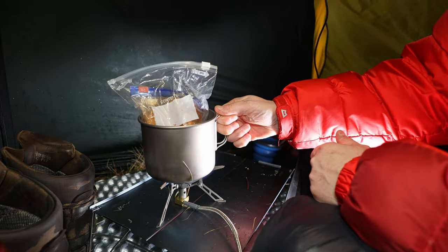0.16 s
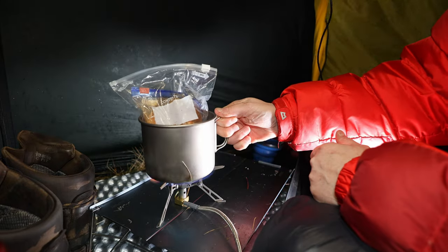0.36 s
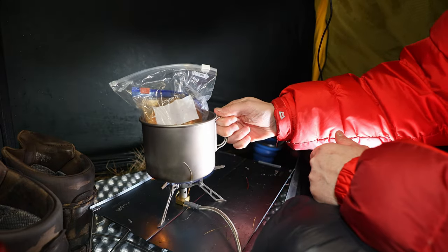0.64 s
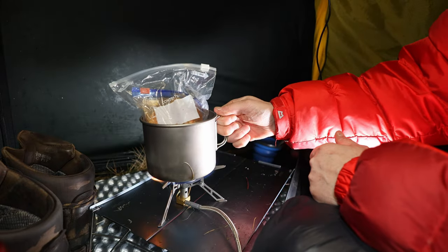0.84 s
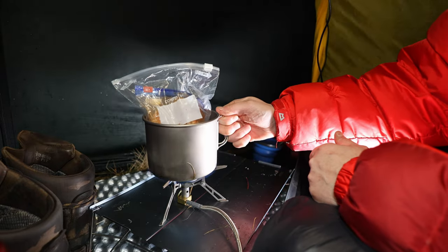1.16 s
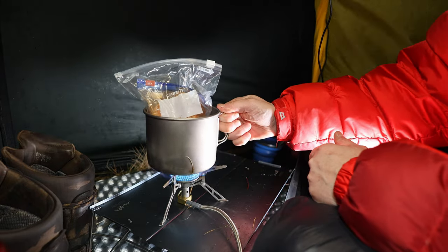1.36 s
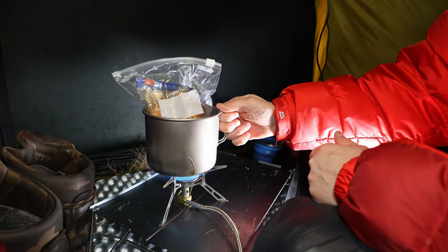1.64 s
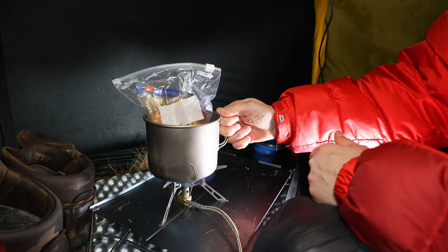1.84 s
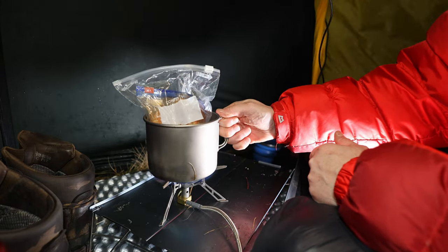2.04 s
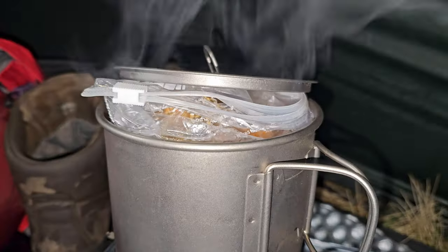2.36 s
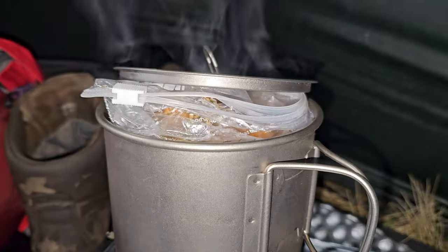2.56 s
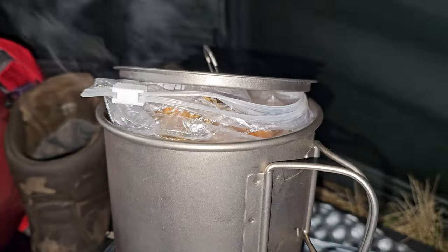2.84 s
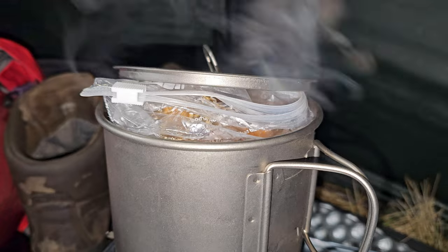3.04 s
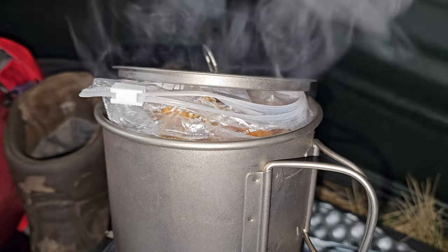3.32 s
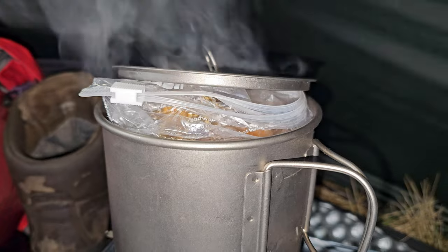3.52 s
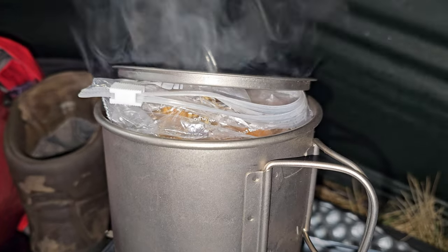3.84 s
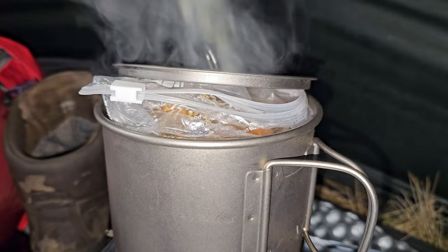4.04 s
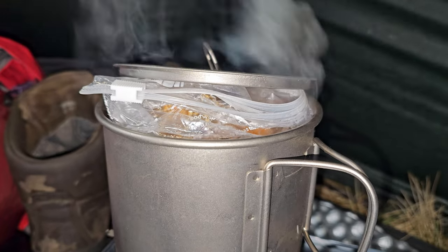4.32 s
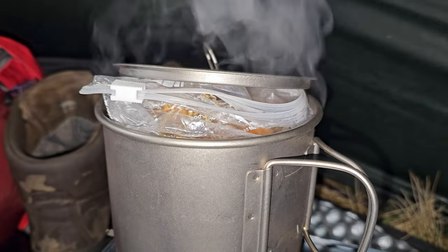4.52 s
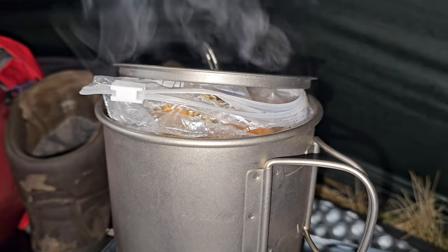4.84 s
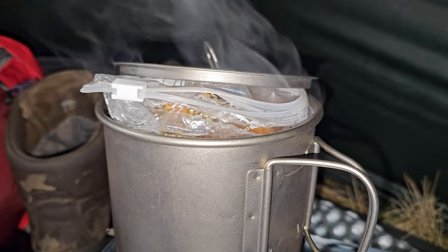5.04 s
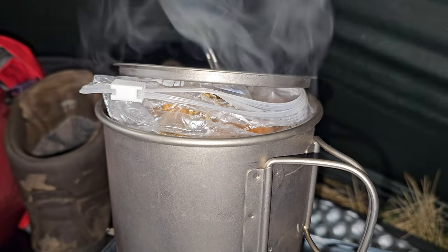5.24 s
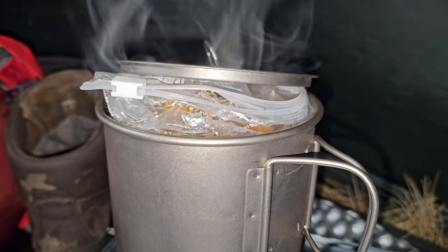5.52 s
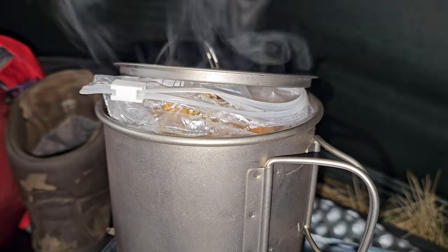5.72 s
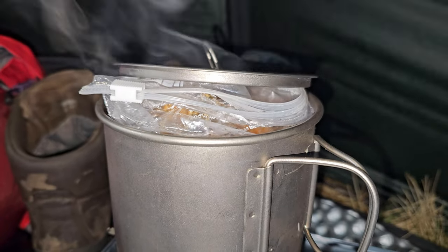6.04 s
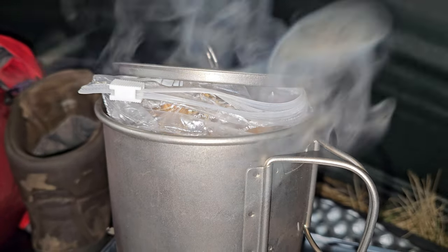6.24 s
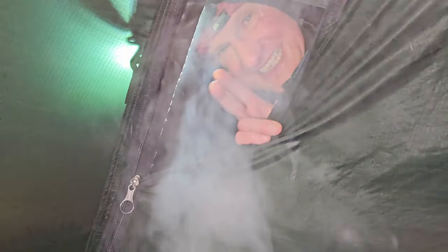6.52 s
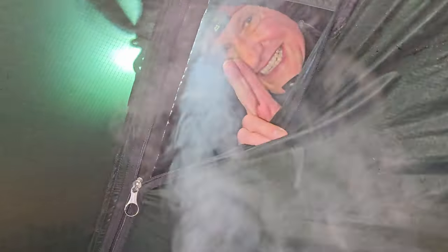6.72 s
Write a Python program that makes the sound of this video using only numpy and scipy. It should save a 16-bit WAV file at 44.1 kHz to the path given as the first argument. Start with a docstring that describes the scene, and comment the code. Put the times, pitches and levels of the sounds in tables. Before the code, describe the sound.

A small gas stove hisses nearby inside a tent, with a high, breathy whistle and a low, fluttering flame. At about 0.5 seconds a metal pot clicks sharply twice on its supports, and at 1.8 seconds it knocks dully. Nylon rustles lightly as a low wind rumble builds. Between 2.1 and 2.7 seconds the mono sound dissolves into a stereo close-up of the steaming pot, a softer ringing hiss with a fine sizzle. Gusts make the tent walls boom, flap and snap, slightly to the left, strongest from 2.7 to 3.5 seconds. Drops spit faintly on hot metal around 3 seconds and again near 6. The wind eases between 4 and 5 seconds, then returns with a heavy thump at 5.6. After a tiny break at 6.4 seconds, the burner hisses from further off under lighter gusts until about 7 seconds.

```python
"""A gas stove hisses and whistles in a tent, its flame fluttering in the draught. The metal pot, held by
its handle, clicks twice on the supports, then knocks dully. This mono opening dissolves into a stereo
close-up of the steaming pot: drops spit on hot metal while gusts make the tent cloth boom and flap.
After a short break the burner is heard from further off."""
import sys
import numpy as np
from scipy import signal
from scipy.fft import rfft, irfft, next_fast_len
from scipy.io import wavfile
from scipy.ndimage import uniform_filter1d, map_coordinates

SR = 44100
rng = np.random.default_rng(int(sys.argv[2]) if len(sys.argv) > 2 else 0)


def file_out(sig):
    """Save sig as 16-bit WAV at sys.argv[1]."""
    # one column per channel
    cols = np.atleast_2d(sig).T
    # limit, then scale
    lim = np.clip(cols, -1, 1)
    pcm = np.round(lim * 32767).astype(np.int16)
    wavfile.write(sys.argv[1], SR, pcm)


N = 303393

# wind leaning on the tent between gusts: (time [s], boom level [dB])
STEADY_WIND = [(2.1, -25), (2.55, -23), (2.9, -19.5), (3.28, -24), (3.6, -23.5), (4.15, -29), (4.5, -32),
               (4.87, -31.5), (5.35, -24.5), (5.9, -20), (6.25, -25), (6.43, -32), (6.88, -31.5)]
# gusts hit a tent panel: (start [s], length [s], boom [dB], flutter [dB], panel pitch [Hz])
GUSTS = [(2.673, 0.06, -14.5, -25, 260), (2.772, 0.075, -19.5, -35.5, 120), (2.847, .17, -17.5, -30, 250),
         (3.1, 0.054, -18.5, -31.5, 150), (3.37, 0.075, -19.5, -38, 150), (3.439, 0.13, -21.5, -34.5, 250),
         (3.569, 0.079, -23, -42, 290), (3.935, .035, -19.5, -31.5, 230), (4.257, 0.11, -25, -46, 95),
         (4.56, 0.027, -26.5, -42, 260), (4.629, 0.078, -26, -45, 100), (4.97, 0.045, -25.5, -31.5, 250),
         (5.058, 0.11, -24.5, -36, 290), (5.439, .09, -21.5, -35.5, 200), (5.584, 0.14, -15.8, -24.3, 240),
         (5.775, .15, -15.5, -24, 240), (6.56, 0.12, -22.5, -40.5, 252), (6.771, .03, -25.5, -38, 100)]
# a whole wall bellies out: (time [s], level [dB], pitch [Hz])
WALL_THUMPS = [(1.965, -16, 200), (2.66, -10.5, 60), (3.479, -7.5, 93), (5.607, -5, 82)]
# a fold of cloth snaps taut: (time [s], level [dB], pitch [Hz])
FOLD_SNAPS = [(0.267, -31, 1650), (0.517, -32, 1100), (1.332, -32, 1800), (1.966, -25, 1090),
              (1.977, -23, 1390), (2.02, -23, 1950), (2.465, -25, 1870), (2.590, -22, 1090),
              (2.693, -13.5, 950), (2.865, -20.5, 1090), (2.998, -14, 1180), (3.196, -21.5, 875),
              (3.301, -19.5, 1370), (3.437, -23, 850), (3.481, -20, 1200), (3.950, -17, 980),
              (5.217, -24, 1510), (5.610, -14, 1180), (6.02, -19, 1970)]
# nylon brushes on nylon: (time [s], level [dB])
RUSTLES = [(0.1664, -31.5), (0.4246, -30.5), (1.5287, -34.5), (1.906, -26.3), (3.459, -36), (3.694, -38),
           (4.17, -36.5), (4.524, -36), (4.985, -37), (5.6908, -32), (5.912, -31.5), (6.21, -36.5),
           (6.2682, -37), (6.4023, -43)]
# drops spit on hot metal: (time [s], level [dB], pitch [Hz], splutter against ring [dB])
SPITS = [(2.788, -33.5, 11450, -10), (3.055, -42, 10800, -2), (3.182, -32.5, 14130, -1),
         (5.673, -42, 11500, -12), (5.807, -35, 14200, -1), (6.150, -41, 11750, -8)]
# the pot clicks on its supports: (time [s], peak level [dB])
POT_CLICKS = [(0.4475, -4), (0.5706, -2)]
# the flame roars as it takes hold: (time [s], level [dB])
FLAME_ROAR = [(0, -36), (.7, -34), (1.25, -31), (1.9, -32.5), (2.25, -34.5)]
# puffs of draught ruffle the flame: (start [s], length [s], level [dB])
DRAUGHT_PUFFS = [(0.395, .05, -35), (.54, .02, -39), (0.818, .04, -37), (1.06, .04, -36.5),
                 (1.266, .05, -34), (1.55, .08, -35), (1.745, .04, -40.5), (1.952, .045, -27.5)]
# the gas jet: (time [s], hiss level [dB], whistle pitch [Hz])
GAS_JET = [(0, -39.5, 4294), (.78, -39, 4340), (1.05, -38.6, 4480), (1.4, -38.5, 4414), (1.58, -41, 4380),
           (1.95, -37, 4465), (2.25, -41, 4425), (2.5, -42, 4420)]

# resonances: (frequency [Hz], width [Hz], relative level [dB])
WALL_MODES = [(92, 26.4, 0)]  # the tent wall as a slack drum
POT_RING_MODES = [(3250, 560, -6), (5010, 420, 0), (7210, 264, 3.5), (8375, 900, -35.5), (11700, 500, -13)]  # hiss ringing around the pot
POT_KNOCK_MODES = [(1080, 170, 3), (1455, 160, 1), (3230, 120, -19)]  # the full pot, knocked
BURNER_HEAD_MODES = [(2240, 110, -5.5), (3300, 300, -7.5), (3960, 180, 0), (5200, 250, -5.5),
                     (6090, 210, 2.5), (6440, 110, -5), (6900, 190, 1), (7550, 230, 3), (8250, 160, 1),
                     (10870, 380, -11.5)]  # the head, rung by the jet

# tone colours: (frequency [Hz], relative level [dB])
BOOM_SPECTRUM = [(11, -37), (18, -3), (48, 3.5), (80, 1.5), (231, -9.5), (392, -24), (447, -21.5),
                 (489, -22), (600, -20.5), (780, -27), (1320, -120)]  # deep wind
FOLD_SPECTRUM = [(150, -2.5), (280, 1.5), (380, -5), (450, 0), (600, -9.5), (820, -5), (1000, -10.5),
                 (1200, -11), (1650, -14.5), (2400, -27.5), (3000, -24.5), (5000, -46), (9000, -65)]  # shaken cloth
NYLON_SPECTRUM = [(500, -11), (1600, 6.5), (3500, 5.5), (8000, -7), (16000, -13)]  # brushing nylon
STEAM_SPECTRUM = [(600, 3), (1500, 5.5), (3200, -1.5), (6000, -2.5), (8500, -1.5), (10500, -9.5),
                  (13000, -8), (16000, -4.5)]  # hiss at the steaming pot
METAL_SPECTRUM = [(300, 0), (2200, -16), (3500, -4.5), (8500, -2), (11000, -5.5), (13000, -7),
                  (16000, -2.5)]  # metal on metal
DRAUGHT_SPECTRUM = [(100, -7), (300, -2), (600, -5.5), (1000, -11), (2000, -19.5), (5000, -41)]  # fluttering flame
FLAME_SPECTRUM = [(40, -35), (90, -10), (160, -3), (235, -1), (320, -6.5), (480, -12.5), (650, -18.5),
                  (1000, -23.5), (2000, -59)]  # low roar
FAR_JET_SPECTRUM = [(1000, -5), (2000, 0.5), (4000, -2), (5200, 0), (6300, -7), (7500, 3), (8600, -1),
                    (10000, -8), (16000, -8)]  # the jet from further off
JET_SPECTRUM = [(600, -48), (1400, -2), (2300, -7.5), (2700, -5), (3200, -1), (3650, -12), (4300, 2),
                (5300, 1), (6100, -4), (8200, -4.5), (9200, -6.5), (10200, -24), (12000, -26), (16000, -17)]  # the jet nearby

# how alike left and right sound: (frequency [Hz], likeness [1 and above = fully alike])
STEREO_LIKENESS = [(110, 1.5), (220, 1.15), (400, 0.74), (800, .88), (1400, 0.4), (2200, .5), (7000, 0.02),
                   (15000, -0.07)]
# how the image leans: (frequency [Hz], left minus right [dB])
STEREO_TILT = [(60, 0.42), (110, 0.76), (200, 1.9), (380, 2.3), (700, 2.1), (1290, 4.4), (2380, 2.4),
               (4400, 0.26), (8120, 6), (15000, 1.5)]
# dissolve from the opening to the close-up: (time [s], progress [0 to 1])
DISSOLVE = [(2.08, 0), (2.65, 1)]

GUST_RISE_S, GUST_FALL_S = 0.02, 0.051
CALM_BOOM_DB, CALM_FLUTTER_DB, FLUTTER_DB_PER_DB = -29.5, -43.5, 0.81  # cloth flutter follows the wind
BREEZE_FINAL_DB, BREEZE_CLIMB_DB, BREEZE_BUILD_S = -37.5, 14, 0.82
STEAM_DB, POT_RING_DB = -45.5, -44
KNOCK_S, KNOCK_PEAK_DB = 1.830, -15
HEAD_DB, WHISTLE_DB, WHISTLE_WAVER_HZ = 1.5, 1.66, 25.04  # levels against the hiss of the jet
NORMAL_JET_DB, HEAD_DB_PER_DB = -39.5, 0.5  # the head rings harder as the jet rises over normal
BREAK_START_S, BREAK_END_S, BREAK_DB = 6.36, 6.392, -34.5
TOP_HZ = 15900


def amp(db):
    """Decibels to gain."""
    return 10 ** (np.asarray(db) / 20)


def unit(x):
    """Scale to rms 1."""
    return x / np.sqrt(np.mean(x ** 2) + 1e-20)


def peaked(x):
    """Scale to peak 1."""
    return x / np.abs(x).max()


def along(points, hz):
    """Read (frequency [Hz], value) points on a log axis."""
    freqs, values = np.transpose(points)
    return np.interp(np.log(hz + 1), np.log(freqs + 1), values)


def clock(size=N):
    """The time of each sample in seconds."""
    return np.arange(size) / SR


def curves(rows):
    """One automation curve for each column after the time."""
    times, *columns = np.transpose(rows)
    return [np.interp(clock(), times, column) for column in columns]


def wobble(rate):
    """A smooth random curve, rate knots a second."""
    return map_coordinates(rng.standard_normal(int(N * rate / SR) + 4), [clock() * rate])


def white(size=N):
    """Two unrelated white noises."""
    return rng.standard_normal((2, size))


def filtered(x, response):
    """x through a frequency response."""
    size = x.shape[-1]
    padded = next_fast_len(size + 8192)
    return irfft(rfft(x, padded) * response(np.fft.rfftfreq(padded, 1 / SR)), padded)[..., :size]


def coloured(x, spectrum):
    """x through an EQ curve, at rms 1."""
    return unit(filtered(x, lambda hz: amp(along(spectrum, hz))))


def resonant(x, modes):
    """x through a set of resonances, at rms 1."""
    def power(f):
        return sum(amp(db) ** 2 * (f * width) ** 2 / ((hz * hz - f * f) ** 2 + (f * width) ** 2)
                   for hz, width, db in modes)
    return unit(filtered(x, lambda f: np.sqrt(power(f))))


def levelled(pair):
    """Noise with its slow swells evened out, so that its envelope alone sets the strength."""
    power = np.abs(uniform_filter1d(pair[0] ** 2, size=SR // 14))
    return pair / np.sqrt(power + 1e-6)


def patchy(x, depth_db, rate):
    """Shifting reflections raise and lower narrow patches of the spectrum, rate times a second."""
    bands = signal.stft(x, nperseg=512)[2]
    bins, frames = bands.shape
    knots = rng.standard_normal((bins, int(rate * N / SR) + 4))
    grid = np.meshgrid(np.arange(bins) / 2, np.linspace(0, rate * N / SR, frames), indexing="ij")
    gain = amp(depth_db * map_coordinates(knots, grid, order=1))
    return unit(signal.istft(bands * gain, nperseg=512)[1][:N])


def add(track, start, sound):
    """Mix a sound in at start seconds."""
    room = track[..., round(start * SR):][..., :sound.shape[-1]]
    room += sound[..., :room.shape[-1]]


def burst(x, attack, t60):
    """Give x a quick attack and a decay of 60 dB in t60 seconds."""
    t = clock(x.shape[-1])
    envelope = (1 - np.exp(-t / attack)) * amp(-60 * t / t60)
    return x * envelope / envelope.max()


def swell(start, length, rise, fall):
    """Envelope of a push of air: it rises, holds and dies away."""
    t = clock() - start
    return np.clip(t / rise, 0, 1) * np.exp(-np.maximum(t - length, 0) / fall)


def crackle(rate, spread_db, t60):
    """Noise made of short puffs at random times and of uneven size."""
    onsets = rng.random(N) < rate / SR
    sizes = onsets * amp(spread_db * np.minimum(rng.exponential(size=N), 3))
    fade = amp(-60 * clock(SR // 10) / t60)
    power = np.abs(signal.fftconvolve(sizes ** 2, fade ** 2)[:N])
    return unit(white() * np.sqrt(power))


def grains(rate, hz, spread, cycles, spread_db):
    """Two unrelated streams of tiny damped pops, each at its own pitch and size."""
    count = int(2 * rate * N / SR)
    when, pitch, size, phase = rng.random((count, 4)).T[..., None]
    pop_hz = hz * np.exp(spread * (2 * pitch - 1))
    t = clock(int(3 * cycles * SR / hz))
    gains = amp(-spread_db * np.log(np.maximum(size, .03)))
    decay = np.exp(-2 * pop_hz * t / cycles) * (1 - t / t[-1])
    pops = gains * np.sin(2 * np.pi * (pop_hz * t + phase)) * decay
    places = (when * 2 * N).astype(int) + np.arange(len(t))
    return unit(np.bincount(places.ravel(), pops.ravel(), 2 * N)[:2 * N].reshape(2, N))


def stereo_image(pair, lag_ms):
    """Two spaced listening points share the bass but not the treble; the right one lags by lag_ms."""
    def width(hz):
        angle = np.arccos(np.clip(along(STEREO_LIKENESS, hz), -1, 1)) / 2
        return np.array([np.cos(angle), np.sin(angle)])

    def pan(hz):
        share = np.array([[.5], [-.5]])
        return amp(share * along(STEREO_TILT, hz)) * np.exp(2j * np.pi * hz * share * lag_ms / 1000)
    mid, side = filtered(pair, width)
    return filtered(np.array([mid + side, mid - side]), pan)


def breeze():
    """A low bed of distant wind builds under the opening."""
    level_db = BREEZE_FINAL_DB - BREEZE_CLIMB_DB * np.exp(-clock() / BREEZE_BUILD_S)
    return amp(level_db) * coloured(white()[0], BOOM_SPECTRUM)


def wind_force():
    """Envelopes of boom and flutter: gusts ride on the steady wind, and the cloth takes them unevenly."""
    wind_db, = curves(STEADY_WIND)
    push_power = amp(wind_db) ** 2
    shake_power = amp(CALM_FLUTTER_DB + FLUTTER_DB_PER_DB * (wind_db - CALM_BOOM_DB)) ** 2
    for start, length, boom_db, flutter_db, _ in GUSTS:
        gust = swell(start, length, GUST_RISE_S, GUST_FALL_S)
        push_power += (amp(boom_db) * gust) ** 2
        shake_power += (amp(flutter_db) * gust) ** 2
    eddies = wobble(42)
    return np.sqrt(push_power) * amp(eddies), np.sqrt(shake_power) * amp(2.3 * eddies)


def tent_walls(push, shake):
    """Gusts pump the walls, which boom, and shake their folds into a dense flutter of small pops."""
    boom = levelled(coloured(white(), BOOM_SPECTRUM) + amp(-8.5) * resonant(white(), WALL_MODES))
    pops = grains(rate=600, hz=1010, spread=1.14, cycles=2.56, spread_db=3.0)
    crisp_pops = unit(np.diff(pops, prepend=0))
    crumple = amp(-2.5) * crackle(rate=290, spread_db=2.5, t60=0.027)
    flutter = coloured(crisp_pops + crumple, FOLD_SPECTRUM)
    swish = amp(-17.5) * coloured(crackle(rate=180, spread_db=3.3, t60=0.038), NYLON_SPECTRUM)
    out = push * boom + shake * (flutter + swish)
    t = clock(SR // 10)
    for start, db, hz in WALL_THUMPS:  # one heavy push of air and its rebound
        add(out[0], start, -amp(db) * burst(np.sin(2 * np.pi * hz * t), attack=.01, t60=0.052))
    return out


def tent_panels(against_boom_db=-7.5, relative_width=0.54):
    """Each gust drums on one panel of the tent; the tauter the panel, the higher its pitch."""
    out = np.zeros((2, N))
    for start, length, boom_db, _, hz in GUSTS:
        drum = levelled(resonant(white(SR // 2), [(hz, relative_width * hz, 0)]))
        muffled = filtered(drum, lambda f: 1 / (1 + (f / (2 * hz)) ** 4))
        placed = np.zeros((2, N))
        add(placed, start, muffled)
        out += amp(boom_db + against_boom_db) * swell(start, length, GUST_RISE_S, GUST_FALL_S) * placed
    return out


def tent_cloth():
    """Single folds snap with a hollow pop that the tent echoes; layers of nylon brush past each other."""
    out = np.zeros((2, N))
    t = clock(SR // 10)
    for start, db, hz in FOLD_SNAPS:
        snap = burst(np.sin(2 * np.pi * hz * t), attack=0.00025, t60=0.0043)
        echo = resonant(resonant(white(len(t)), [(hz, 1000, 0)]), [(hz, 2000, 0)])
        add(out[0], start, amp(db) * snap)
        add(out, start, amp(db - 5.5) * burst(echo, attack=0.00029, t60=0.021))
    for start, db in RUSTLES:
        brush = coloured(white(SR // 5), NYLON_SPECTRUM)
        sheen = amp(-12) * resonant(white(SR // 5), [(13400, 5600, 0)])
        add(out, start, amp(db) * burst(brush + sheen, attack=0.0016, t60=0.14))
    return out


def spitting_drops(shake):
    """Drops boil off the hot metal with a thin, high ring and a splutter; gusts shake down a fine fizz."""
    fizz = resonant(crackle(rate=90, spread_db=5, t60=0.044), [(11700, 620, 0), (14200, 1500, -6)])
    out = amp(-22) * shake * fizz
    for start, db, hz, splutter_db in SPITS:
        ring = burst(resonant(white(SR // 10), [(hz, 220, 0)]), attack=0.0022, t60=.07)
        spray = resonant(white(SR // 10), [(11000, 1500, 0), (14500, 1800, -1)])
        splutter = burst(spray, attack=.0016, t60=.05)
        add(out, start, amp(db) * (ring + amp(splutter_db) * splutter))
    return out


def steaming_pot():
    """Close up the burner's hiss rings around the pot, and the water adds a fine sizzle."""
    ring = amp(POT_RING_DB + 1.2 * wobble(13)) * resonant(white(), POT_RING_MODES)
    sizzle = amp(-4.5) * coloured(crackle(rate=60, spread_db=7, t60=0.023), STEAM_SPECTRUM)
    prickle = amp(-15.5) * grains(rate=50, hz=10000, spread=0.51, cycles=57, spread_db=4.5)
    steam_gain = amp(STEAM_DB + 0.42 * wobble(8.9))
    return ring + steam_gain * (coloured(white(), STEAM_SPECTRUM) + sizzle + prickle)


def pot_clicks(bounce_s=0.00158, bounce_db=-1, tail_db=-17):
    """The pot strikes its supports, metal on metal, with a tiny bounce; the tent answers briefly."""
    def metal(attack, t60):
        return burst(coloured(white(SR // 10)[0], METAL_SPECTRUM), attack, t60)
    out = np.zeros(N)
    for start, db in POT_CLICKS:
        add(out, start, amp(db) * peaked(metal(attack=.00005, t60=0.0055)))
        add(out, start + bounce_s, amp(db + bounce_db) * peaked(metal(attack=.00005, t60=0.0056)))
        add(out, start, amp(db + tail_db) * metal(attack=0.00068, t60=0.045))
    return out


def pot_knock():
    """The full pot knocks dully: its modes die fast over a soft thud."""
    out = np.zeros(N)
    t = clock(SR // 10)
    ring = sum(amp(db) * np.sin(2 * np.pi * hz * t) * np.exp(-np.pi * width * t)
               for hz, width, db in POT_KNOCK_MODES)
    soft_attack = 1 - np.exp(-t / .003)
    thud = amp(-22) * burst(coloured(white(len(t))[0], FOLD_SPECTRUM), attack=0.0009, t60=0.069)
    add(out, KNOCK_S, amp(KNOCK_PEAK_DB) * peaked(ring * soft_attack + thud))
    return out


def far_burner():
    """From further off the stove is a steady hiss of gas over a low flame."""
    hiss = amp(-46.5) * coloured(white(), FAR_JET_SPECTRUM)
    return hiss + amp(-42.5) * coloured(white(), FLAME_SPECTRUM)


def flame():
    """The flame roars low; puffs of draught swell the roar and bring up its flutter."""
    draught = sum(amp(db) * swell(start, length, rise=0.012, fall=0.061)
                  for start, length, db in DRAUGHT_PUFFS)
    steady = amp(curves(FLAME_ROAR)[0])
    roar = levelled(coloured(white(), FLAME_SPECTRUM))[0]
    flutter = coloured(crackle(rate=410, spread_db=1.0, t60=0.029)[0], DRAUGHT_SPECTRUM)
    return np.hypot(steady, amp(-0.5) * draught) * roar + np.hypot(amp(-12.5) * steady, draught) * flutter


def whistle(pitch_hz, width_hz):
    """A breathy tone: a narrow band of noise that follows the pitch."""
    breath = filtered(white(), lambda hz: 1 / (1 + (hz / width_hz) ** 2))
    phase = 2 * np.pi * np.cumsum(pitch_hz) / SR
    return unit(breath[0] * np.cos(phase) + breath[1] * np.sin(phase))


def gas_jet():
    """Gas hisses, rings and whistles in the burner head; the colour shifts as the hand-held pot sways."""
    jet_db, whistle_hz = curves(GAS_JET)
    hiss = patchy(coloured(white()[0], JET_SPECTRUM), depth_db=3.5, rate=11)
    head_gain = amp(HEAD_DB + HEAD_DB_PER_DB * (jet_db - NORMAL_JET_DB))
    head = patchy(resonant(white()[0], BURNER_HEAD_MODES), depth_db=4.5, rate=11)
    tone_gain = amp(WHISTLE_DB + 0.5 * wobble(5.4))
    tone = whistle(whistle_hz + WHISTLE_WAVER_HZ * wobble(9), width_hz=200)
    return amp(jet_db) * (hiss + head_gain * head + tone_gain * tone)


def scene():
    """Three perspectives on the stove in turn: mono, close up in stereo, and further off."""
    t = clock()
    cloth = tent_cloth()
    push, shake = wind_force()
    opening = gas_jet() + flame() + breeze() + pot_clicks() + pot_knock() + cloth[0]
    far = far_burner()
    stove = np.where(t < BREAK_START_S, steaming_pot(), far) + spitting_drops(shake)
    tent = tent_walls(push, shake) + tent_panels() + cloth
    # the stove is straight ahead, the windward wall to the left
    stereo = stereo_image(stove, lag_ms=0) + stereo_image(tent, lag_ms=0.19)
    dissolve = np.clip(curves(DISSOLVE)[0], 0, 1)
    mix = np.sqrt(1 - dissolve) * opening + np.sqrt(dissolve) * stereo
    gate = uniform_filter1d(1.0 * ((t < BREAK_START_S) | (t > BREAK_END_S)), size=128)
    return mix * np.maximum(gate, amp(BREAK_DB))


def record(dry):
    """Peaks stop at full scale and the treble falls away steeply at the band limit."""
    return filtered(np.clip(dry, -1, 1), lambda hz: np.exp(-(hz / TOP_HZ) ** 44))


dry = scene()
out = record(dry)
file_out(out)
```